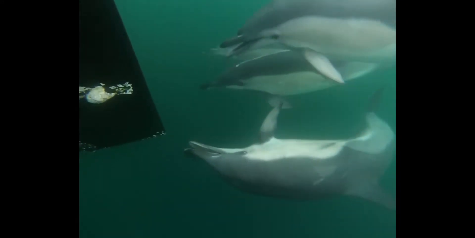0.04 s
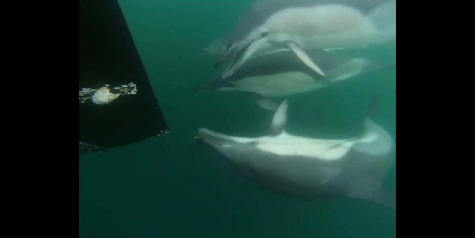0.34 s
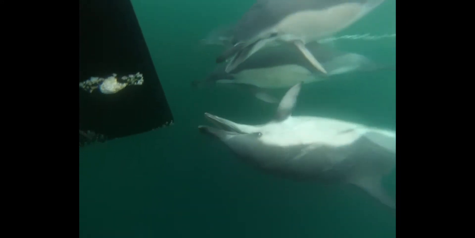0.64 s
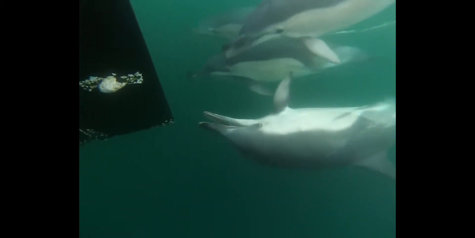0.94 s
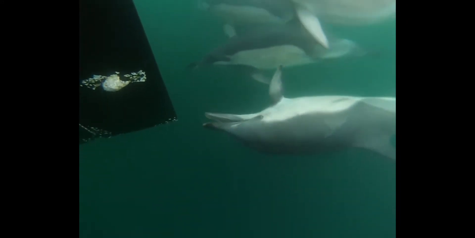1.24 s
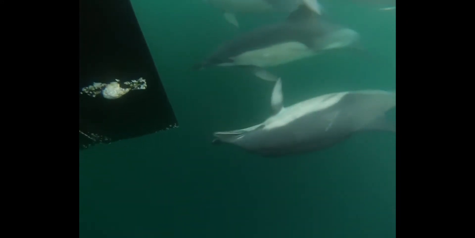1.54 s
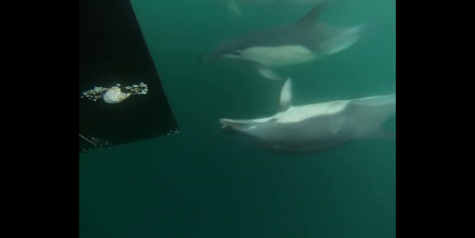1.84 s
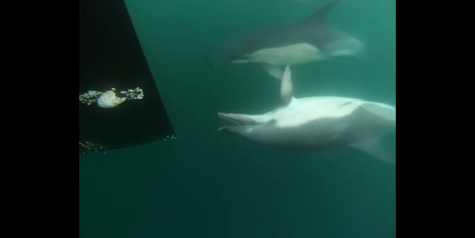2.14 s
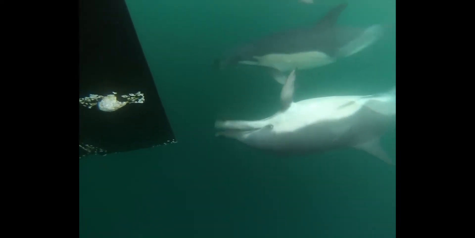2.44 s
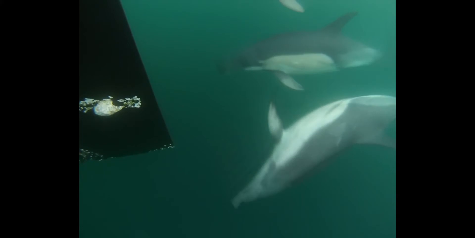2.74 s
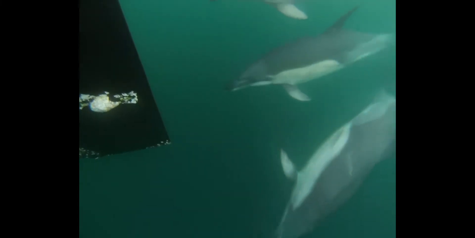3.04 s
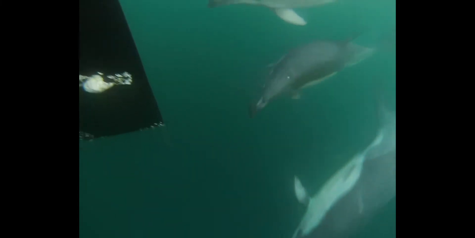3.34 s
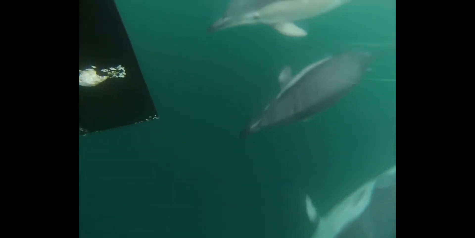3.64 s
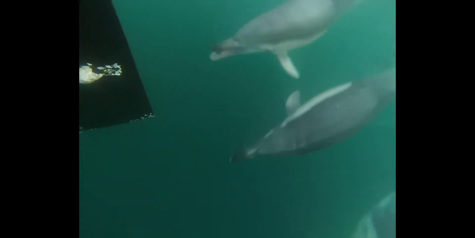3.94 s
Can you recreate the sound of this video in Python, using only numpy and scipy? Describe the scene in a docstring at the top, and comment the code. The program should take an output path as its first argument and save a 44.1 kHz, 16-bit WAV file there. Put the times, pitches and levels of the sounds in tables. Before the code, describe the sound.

A dolphin whistles close to an underwater microphone, a high tone that swoops down twice, while other dolphins buzz and click faintly. Scattered bubbles then build into a gurgling, crackling rush, with soft bumps of water against the microphone.

```python
"""A dolphin whistles close to the microphone, under water: a high tone that swoops down twice.
Other dolphins buzz and click faintly, their buzz made of clicks fast enough to merge.
Air bubbles ring all the time, sparsely at first, then as a gurgling, crackling rush past the camera.
The moving water also rumbles and bumps against the housing. The sound is mono."""
import sys
import numpy as np
from scipy import signal
from scipy.fft import rfft, irfft, next_fast_len
from scipy.io import wavfile
from scipy.ndimage import uniform_filter1d, map_coordinates

SR = 44100
rng = np.random.default_rng(int(sys.argv[2]) if len(sys.argv) > 2 else 0)


def dump(signal):
    """Clip the signal to [-1, 1] and save it as 16-bit WAV at the path in sys.argv[1]."""
    limited = np.clip(np.atleast_2d(signal).T, -1, 1)
    pcm = np.round(limited * 32767).astype(np.int16)
    wavfile.write(sys.argv[1], SR, pcm)


N = 176400

# water rushing past the microphone: time_s, gurgle_db, babble_db, crackle_db
FLOW_LEVELS = [(0, -48, -43, -53), (0.6, -48.5, -44.5, -49), (1.2, -54.5, -45, -50), (1.5, -42, -41.5, -49),
               (1.75, -57, -46.5, -48.5), (2.05, -50, -42.5, -48), (2.3, -38.5, -36, -43.5),
               (2.48, -41, -34.5, -43), (2.65, -41, -35, -47.5), (2.83, -48.5, -37.5, -47),
               (3.02, -39, -30, -32), (3.16, -38.5, -33, -36.5), (3.36, -45, -31.5, -38.5),
               (3.5, -40.5, -37, -42.5), (3.7, -42.5, -35.5, -43), (4.0, -46.5, -32, -42)]
# the largest bubbles join late, level relative to the gurgle: time_s, offset_db
GLUG_OFFSET = [(2.6, -15.5), (3.3, -2.5)]
# colour of the bubbles at the microphone: frequency_hz, gain_db
WATER_COLOUR = [(150, 3.5), (400, -15), (680, 1.5), (1000, -4.5), (1900, 1), (2800, -8), (3400, 2),
                (4100, -10.5), (5500, -4), (7400, -7), (8400, -14), (11700, -19), (16000, -35)]
# rumble of the flow on the housing: frequency_hz, gain_db
RUMBLE_COLOUR = [(3, 4), (11, -5.5), (17, 4), (27, -19), (50, -21), (100, -32), (200, -35.5), (600, -59)]
# water bumping the housing: start_s, peak_db, pitch_hz
HOUSING_BUMPS = [(1.316, -33.5, 172), (1.93, -40, 227), (2.767, -29, 184), (2.767, -21.5, 400),
                 (3.832, -23.5, 350)]
# single loud bubbles close by, and a short high ping as the whistle ends: start_s, level_db, pitch_hz
NEAR_BUBBLES_AND_PING = [(0.283, -31.5, 868), (0.547, -21, 3590), (0.71, -19.5, 2120), (0.736, -28.5, 1390),
                         (0.843, -22.5, 4500), (1.003, -22, 3700), (1.046, -34, 480), (1.106, -24, 2266),
                         (1.146, -28.5, 870), (1.224, -18, 7470), (1.259, -20, 2270), (1.316, -17, 1910),
                         (1.316, -31, 508), (1.332, -33, 680), (1.381, -29, 753), (1.385, -21, 2065),
                         (1.409, -29.5, 868), (1.422, -22, 3250), (1.428, -30, 803), (1.616, -19, 3870),
                         (1.64, -27.5, 659), (1.715, -37.5, 730), (1.926, -32, 822), (2.091, -20, 7980),
                         (2.129, -19, 2760), (2.279, -14, 5420), (2.298, -20.5, 1430), (2.33, -19, 5700),
                         (2.543, -18.5, 3360), (2.56, -19.5, 2650), (2.609, -19, 2000), (2.647, -20, 1870),
                         (2.647, -14.5, 4740), (2.665, -18, 3280), (2.897, -16.5, 2240), (2.897, -10, 3450),
                         (2.912, -23, 6300), (2.929, -8, 7110), (2.933, -11.5, 2870), (2.992, -20.5, 1980),
                         (3.016, -10.5, 5200), (3.031, -9, 6790), (3.033, -9.5, 4740), (3.08, -21, 4300),
                         (3.0919, -9, 3310), (3.099, -14.5, 3350), (3.19, -16.5, 3400),
                         (3.255, -15.5, 3630), (3.267, -15.5, 3380), (3.313, -21, 3510),
                         (3.33, -18.5, 3560), (3.332, -9.5, 7400), (3.349, -18, 1945), (3.362, -14, 6100),
                         (3.368, -13.5, 5500), (3.373, -13.5, 7540), (3.412, -16, 3420),
                         (3.425, -10.5, 4530), (3.431, -18, 6800), (3.663, -9, 7220), (3.683, -13.5, 3510),
                         (3.901, -20.5, 3070)]

# faint burst-pulse calls of other dolphins, one curve a call: time_s, pulses_per_s, level_db
BURST_CALLS = [
    [(0, 600, -42.5), (.7, 605, -42), (1.29, 622, -48.5), (1.37, 750, -61)],
    [(.57, 540, -43.5), (.75, 592, -41), (1.1, 617, -44.5)],
    [(1.99, 530, -57), (2.55, 360, -52)],
]
# colour of their pulses: frequency_hz, gain_db
BURST_COLOUR = [(1100, -32), (1800, -1.5), (2800, -10.5), (3600, 5.5), (4700, -10), (7300, 5.5),
                (8600, -9.5), (10400, 2.5), (12500, -11)]
# where each call loses its treble: cutoff_hz
BURST_CUTOFFS = [15100, 4660, 14000]
# sharp dolphin clicks, after which the whistle dips briefly: start_s, level_db, dip_db
SHARP_CLICKS = [(0.163, -31, 5.5), (0.419, -14, 8), (0.675, -33, 23), (1.187, -21, 15)]
# dry ticks: start_s, level_db
DRY_TICKS = [(1.6424, -5.5), (2.581, -9), (2.8842, -11), (2.979, -7.5), (3.2339, -7.5), (3.7477, -6.5),
             (3.9005, -15.5)]

# contour of the close whistle: time_s, pitch_hz
WHISTLE_PITCH = [(0.0, 7885), (0.289, 7750), (0.312, 7730), (0.348, 7300), (0.354, 6470), (0.382, 6160),
                 (0.424, 6080), (0.482, 6160), (0.558, 6620), (0.567, 7400), (0.575, 7570), (0.578, 7020),
                 (0.583, 7390), (0.598, 7724), (0.787, 7650), (0.832, 7590), (0.873, 7280), (0.917, 6180),
                 (0.977, 5780), (1.018, 5835), (1.091, 6320), (1.128, 6715), (1.144, 7081), (1.154, 7550),
                 (1.166, 7730), (1.2, 7150), (1.219, 8200)]
# strength of its main tone: time_s, level_db
WHISTLE_LEVEL = [(0.0, -15.5), (0.076, -21.5), (0.16, -13), (0.196, -19), (0.324, -11), (0.35, -13.5),
                 (0.356, -22.5), (0.41, -24), (0.486, -19.5), (0.555, -12.5), (0.584, -13), (0.598, -21),
                 (0.662, -19), (0.768, -27.5), (0.814, -17), (0.868, -11.5), (0.89, -19.5), (0.896, -7.5),
                 (0.91, -9), (0.915, -21), (0.938, -24.5), (0.954, -15.5), (1.018, -14.5), (1.056, -24),
                 (1.118, -10.5), (1.145, -23.5), (1.184, -15.5), (1.208, -21.5), (1.22, -45.5)]
# buzz that modulates the whistle and gives it side tones: time_s, rate_hz, side_level_db
WHISTLE_BUZZ = [(0, 1182, -42), (.05, 1124, -34), (.2, 955, -36.5), (.31, 860, -28.5), (.42, 980, -43),
                (.56, 897, -43), (.65, 992, -46), (.85, 849, -39), (.97, 797, -47), (1.12, 810, -55)]
# offsets of the side tones from the whistle: buzz_rate_multiple
SIDE_STEPS = [-2, -1, 1, 2, 3]
# colour of the side tones: frequency_hz, gain_db
SIDE_COLOUR = [(4000, -7), (7000, 0), (8300, -16)]

RING_CYCLES, SWELL_CYCLES = 42.4, 1.5  # a bubble's life and attack, in its own cycles
BAND_LIMIT_HZ = 16400


def amp(db):
    """Decibels to gain."""
    return 10 ** (np.asarray(db) / 20)


def unit(x):
    """Scale to rms 1."""
    return x / np.sqrt(np.mean(x ** 2) + 1e-20)


def colour_db(colour, hz):
    """Gain of a colour table at hz, on a log frequency axis."""
    knots_hz, gains_db = np.transpose(colour)
    return np.interp(np.log(hz + 1), np.log(knots_hz + 1), gains_db)


def curves(rows):
    """One value per sample for each column after the time."""
    times_s, *columns = np.transpose(rows)
    return [np.interp(np.arange(N) / SR, times_s, column) for column in columns]


def wobble(per_s):
    """A smooth random curve with per_s knots a second."""
    knots = rng.standard_normal(int(N * per_s / SR) + 4)
    return map_coordinates(knots, [np.arange(N) * per_s / SR])


def filtered(x, response):
    """Filter x by a gain given as a function of frequency."""
    size = next_fast_len(N + SR // 2)
    return irfft(rfft(x, size) * response(np.fft.rfftfreq(size, 1 / SR)), size)[..., :N]


def tone(hz):
    """A sine of rms 1 that follows a pitch curve."""
    return np.sqrt(2) * np.sin(2 * np.pi * np.cumsum(hz) / SR)


def gate(start_s, end_s, fade_s):
    """1 between two times, with linear fades outside."""
    t = np.arange(N) / SR
    return np.clip(np.minimum(t - start_s, end_s - t) / fade_s + 1, 0, 1)


def add(track, start_s, x):
    """Mix x into the track from start_s on."""
    part = track[max(round(start_s * SR), 0):][:len(x)]
    part += x[:len(part)]


def ring(hz, t60_s, rise=0):
    """A damped sine that swells within a few cycles; its pitch climbs by the fraction rise."""
    t = np.arange(int(t60_s * SR) + 8) / SR
    envelope = amp(-60 * t / t60_s) * (1 - np.exp(-t * hz / SWELL_CYCLES))
    return envelope / envelope.max() * np.sin(2 * np.pi * hz * t * (1 + rise * t / t60_s / 2))


def snap(t60_s):
    """A short dying burst of noise."""
    t = np.arange(SR // 20) / SR
    return rng.standard_normal(len(t)) * amp(-60 * t / t60_s) / 2


def bubble_cloud(level_db, low_hz, high_hz, max_per_s, spread_db, rings_db, wash_db, rise):
    """Bubbles of one size range, denser and louder with the flow, over a wash of distant ones."""
    def band(hz):
        skirts = (1 + (low_hz / (hz + 1)) ** 8) * (1 + (hz / high_hz) ** 8)
        return amp(colour_db(WATER_COLOUR, hz)) / np.sqrt(skirts)

    density = amp(level_db - level_db.max()) ** .45
    rings = np.zeros(N)
    for when, pitch, strength, life, chance in rng.random((int(max_per_s * N / SR), 5)):
        if chance < density[int(when * N)]:
            hz = low_hz * (high_hz / low_hz) ** pitch
            db = spread_db * min(-np.log(1 - strength), 3.5) + colour_db(WATER_COLOUR, hz)
            t60_s = RING_CYCLES * 2 ** (3 * life - 2) / hz
            add(rings, when * N / SR, amp(db) * hz / low_hz * ring(hz, t60_s, rise))
    wash = unit(filtered(rng.standard_normal(N), band)) * amp(5 * wobble(90))
    return amp(level_db) * (amp(rings_db) * unit(rings / np.sqrt(density)) + amp(wash_db) * wash)


def rushing_water():
    """Bubbles from the largest (glug) to the smallest (crackle), all sharing the spurts of the flow."""
    spurts_db = 2.5 * wobble(30)
    gurgle_db, babble_db, crackle_db = curves(FLOW_LEVELS) + spurts_db
    glug = bubble_cloud(gurgle_db + curves(GLUG_OFFSET)[0], 315.3, 467.4, max_per_s=63,
                        spread_db=1.5, rings_db=-1, wash_db=-5.5, rise=0.28)
    gurgle = bubble_cloud(gurgle_db, 394.4, 1071.6, max_per_s=260,
                          spread_db=4.5, rings_db=-2, wash_db=-7, rise=0.23)
    babble = bubble_cloud(babble_db, 1110, 4350, max_per_s=750,
                          spread_db=4, rings_db=-1, wash_db=-8.5, rise=0.1)
    crackle = bubble_cloud(crackle_db, 4330, 12930, max_per_s=1200,
                           spread_db=7.5, rings_db=2.5, wash_db=-8.5, rise=0.02)
    return glug + gurgle + babble + crackle


def water_on_housing():
    """Right at the microphone, the flow rumbles and slugs of water bump the housing."""
    rumble = unit(filtered(rng.standard_normal(N), lambda hz: amp(colour_db(RUMBLE_COLOUR, hz))))
    out = amp(-32.5 + 1.5 * wobble(18)) * rumble
    for start_s, db, hz in HOUSING_BUMPS:
        add(out, start_s, amp(db) * ring(hz, t60_s=0.014))
    return out


def burst_calls():
    """Other dolphins: faint, slightly unsteady click trains, fast enough to merge into a thin buzz."""
    out = np.zeros(N)
    for call, cutoff_hz in zip(BURST_CALLS, BURST_CUTOFFS):
        def colour(hz):
            band = (hz > BURST_COLOUR[0][0]) / (1 + (hz / cutoff_hz) ** 12)
            return amp(colour_db(BURST_COLOUR, hz)) * band

        rate_hz, db = curves(call)
        cycles = np.cumsum(rate_hz + 4.5 * wobble(300)) / SR
        pulses = np.sinc((cycles - np.round(cycles)) * SR / rate_hz)  # one click a cycle
        buzz = unit(filtered(pulses, colour))
        out += amp(db + wobble(18.84)) * buzz * gate(call[0][0], call[-1][0], fade_s=0.046)
    return out


def clicks():
    """Broadband dolphin clicks, dry ticks and an even train of faint echolocation pings."""
    out = np.zeros(N)
    for start_s, db, *_ in SHARP_CLICKS + DRY_TICKS:
        add(out, start_s, amp(db) * snap(t60_s=0.0022))
    for start_s in 0.012 + 0.035 * np.arange(9):
        add(out, start_s, amp(-18) * ring(hz=7440, t60_s=0.0099))
    return out


def near_bubbles_and_ping():
    """Close bubbles snap off, ring and shed fragments; a like-sounding ping comes as the whistle ends."""
    rise, split_s, scatter_octaves = 0.034, 0.012, 0.422
    rings, snaps = np.zeros(N), np.zeros(N)
    for start_s, db, hz in NEAR_BUBBLES_AND_PING:
        add(rings, start_s, amp(db + 1.5) * ring(hz, RING_CYCLES / hz, rise))
        add(snaps, start_s, amp(db + 3) * snap(t60_s=0.011))
        for delay, step in zip(rng.random(size=3), rng.standard_normal(size=3)):
            fragment_hz = min(hz * 2 ** (scatter_octaves * step), BAND_LIMIT_HZ)
            fragment = ring(fragment_hz, RING_CYCLES / fragment_hz / 2, rise)
            add(rings, start_s + split_s * delay, amp(db - 10.5) * fragment)
    # the snaps carry little below 450 Hz
    return rings + 2 * filtered(snaps, lambda hz: amp(colour_db(WATER_COLOUR, hz)) * hz / (hz + 450))


def side_tones(whistle_hz):
    """A buzz modulates the whistle, adding tones on both sides that weaken with each step away."""
    jitter_hz, step_loss_db, swell_db = 34.3, 4, 1.5
    buzz_hz, buzz_db = curves(WHISTLE_BUZZ)
    buzz_hz += jitter_hz * wobble(300)
    out = np.zeros(N)
    for step in SIDE_STEPS:
        hz = whistle_hz + step * buzz_hz
        db = buzz_db - step_loss_db * (abs(step) - 1.5) + colour_db(SIDE_COLOUR, hz)
        out += amp(db + swell_db * wobble(20.4)) * tone(hz)
    return out


def whistle():
    """The close dolphin: a gliding tone with its octave and side tones, scattered by hull and surface."""
    jitter_hz, dip_recovery_s = 12.5, 0.0083
    octave_fade_db_per_s, octave_loss_db_per_khz = 22.5, 5.5
    t = np.arange(N) / SR
    hz = uniform_filter1d(curves(WHISTLE_PITCH)[0], size=130) + jitter_hz * wobble(300)
    db = curves(WHISTLE_LEVEL)[0] + wobble(200)
    for click_s, _, dip_db in SHARP_CLICKS:
        db -= dip_db * (t > click_s) * np.exp(-((t - click_s) / dip_recovery_s) ** 2)
    sides = side_tones(hz)
    treble_loss_db = octave_loss_db_per_khz * np.maximum(2 * hz - 12000, 0) / 1000
    octave_db = -5 - octave_fade_db_per_s * t - treble_loss_db + 2.5 * wobble(121.9)
    harmonics = amp(db) * (tone(hz) + amp(octave_db) * tone(2 * hz))
    direct = (harmonics + sides) * gate(0, WHISTLE_PITCH[-1][0], fade_s=0.0039)
    scatter = snap(t60_s=0.046)
    echo = signal.fftconvolve(direct, scatter / np.linalg.norm(scatter))[:N]
    return direct + amp(-19.5) * echo


def scene():
    """Dolphins and water at one microphone, alike in both channels."""
    mono = whistle() + burst_calls() + clicks()
    mono += near_bubbles_and_ping() + rushing_water() + water_on_housing()
    return np.array([mono, mono])


def record(dry):
    """The camera rolls off steeply towards its band limit."""
    return filtered(dry, lambda hz: (hz < BAND_LIMIT_HZ) / np.sqrt(1 + (hz / 14800) ** 70))


dry = scene()
out = record(dry)
dump(out)
```